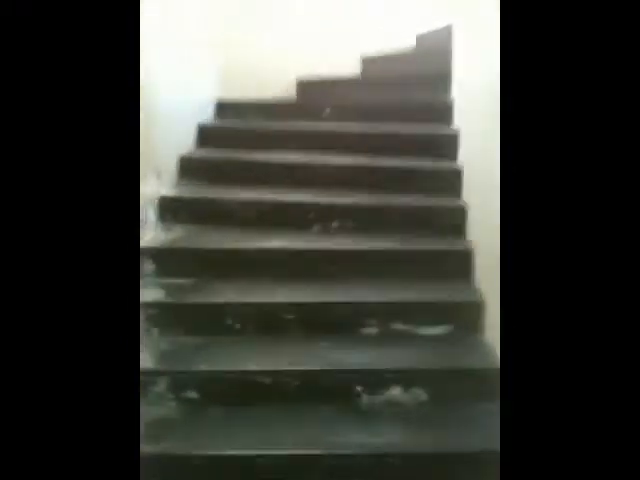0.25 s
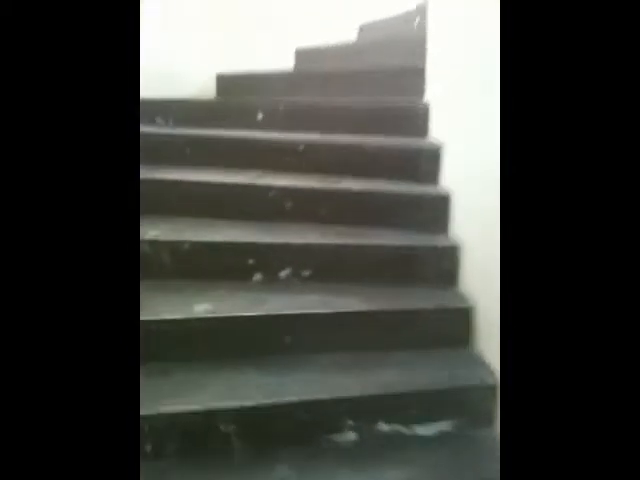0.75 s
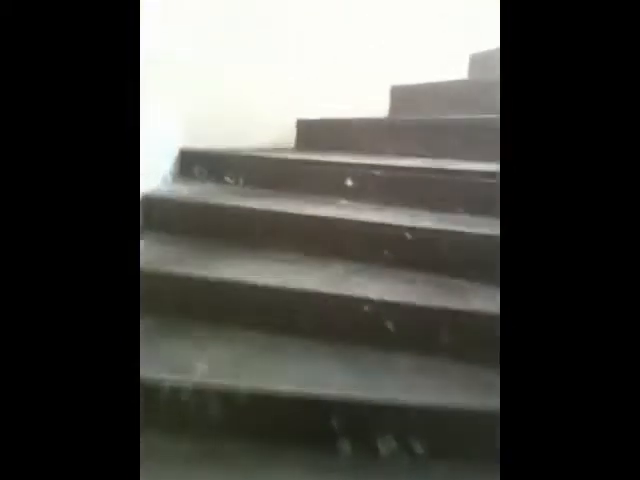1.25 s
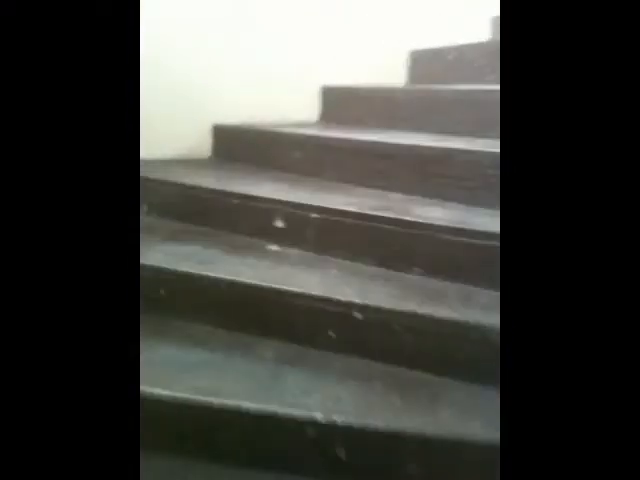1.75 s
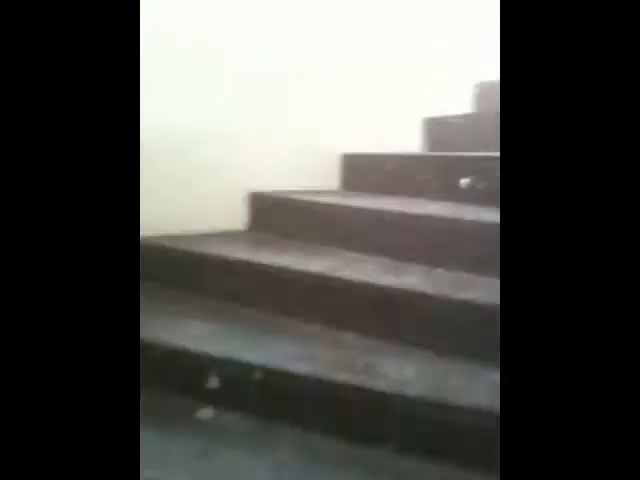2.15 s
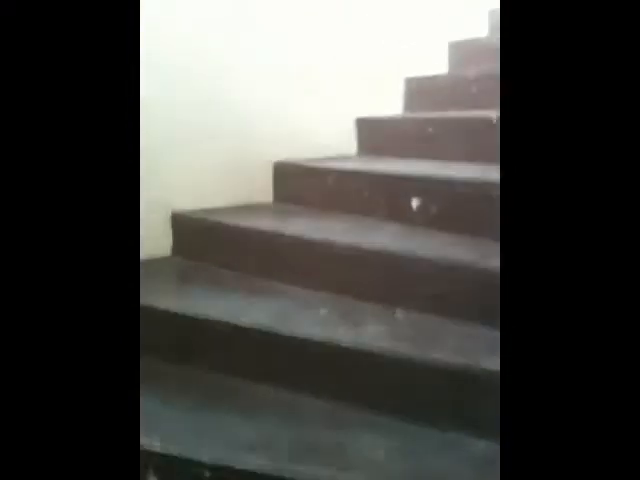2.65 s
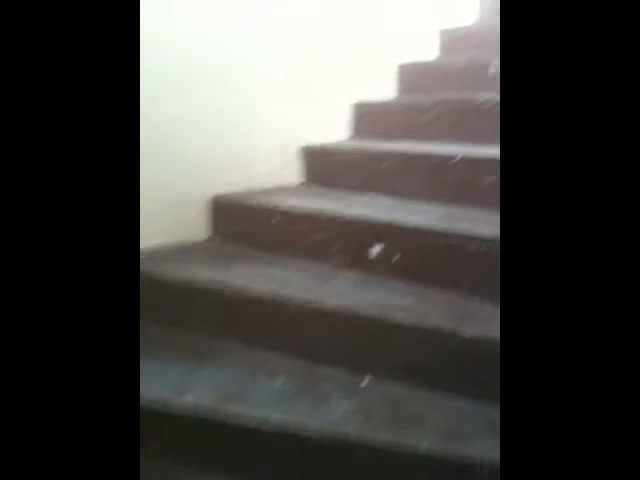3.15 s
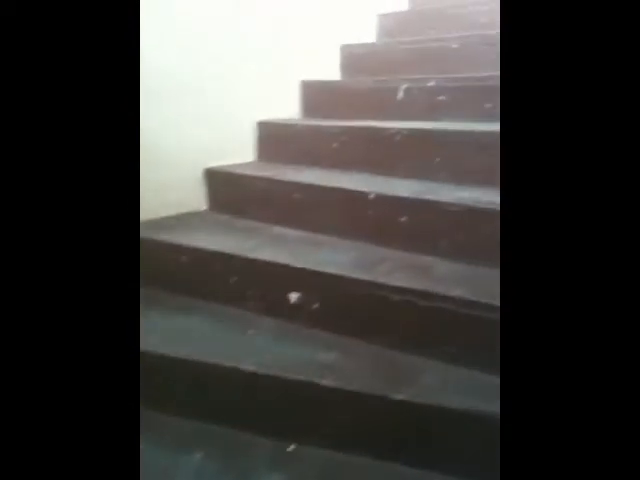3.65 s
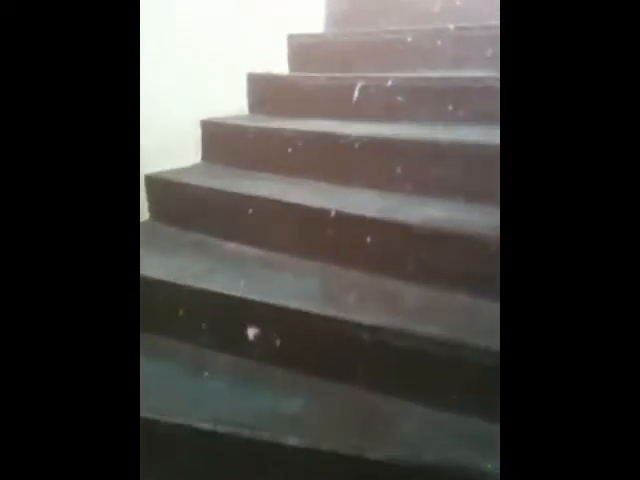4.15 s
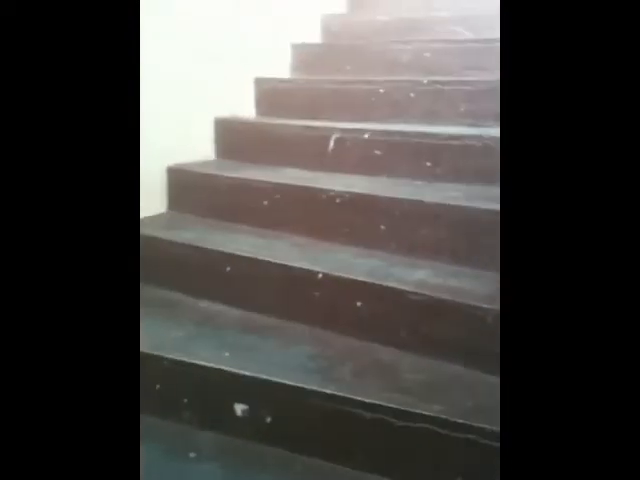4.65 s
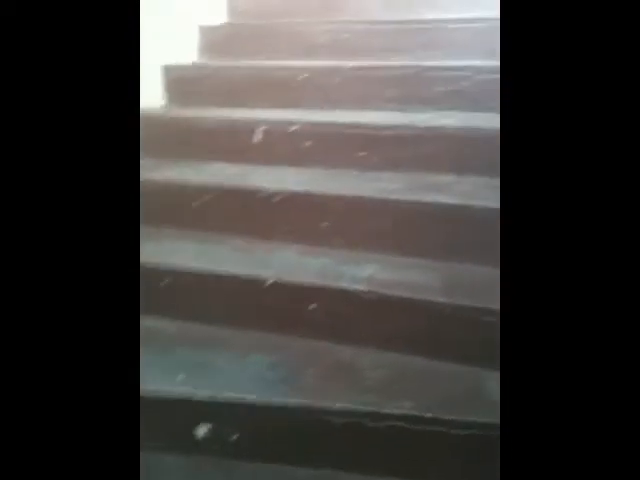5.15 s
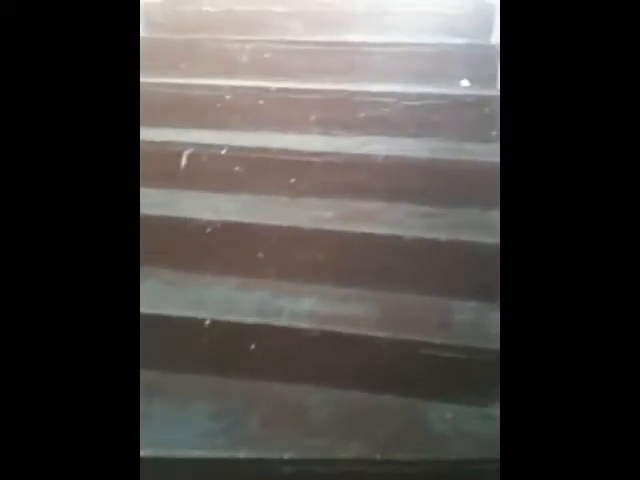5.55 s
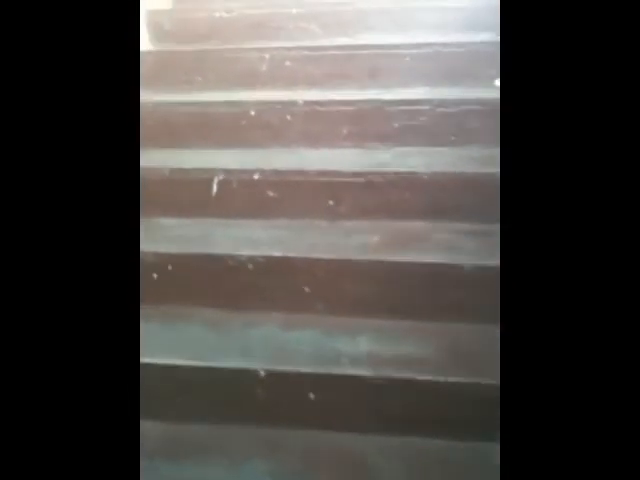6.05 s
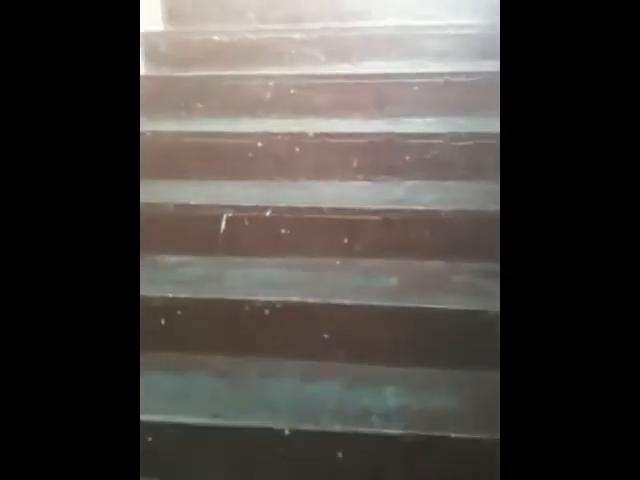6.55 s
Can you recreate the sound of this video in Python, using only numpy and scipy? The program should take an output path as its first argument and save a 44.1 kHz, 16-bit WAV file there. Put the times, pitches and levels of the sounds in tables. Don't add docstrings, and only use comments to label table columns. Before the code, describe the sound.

Heavy turbine and pump drone with wavering high whines and broadband water-and-air roar, heard while climbing concrete stairs, strongest in the last second.

```python
import sys
import numpy as np
from scipy import signal
from scipy.fft import rfft, irfft
from scipy.io import wavfile
from scipy.ndimage import uniform_filter1d

SR = 44100
rng = np.random.default_rng(int(sys.argv[2]) if len(sys.argv) > 2 else 0)


def rack_gain(trim_db):
    fader = np.asarray(trim_db, float)
    return 10 ** (fader / 20)


def persist_wave(psi):
    counts = np.round(np.clip(psi, -1, 1) * 32767).astype(np.int16)
    wavfile.write(sys.argv[1], SR, np.atleast_2d(counts).T)


N = 299880
PUMP_HZ, GEAR_SHAFT_HZ, RUNNER_HZ, MAINS_HZ = 191.47, 16.355, 10.525, 50.03
HZ = np.arange(N // 2 + 1) * SR / N
STEP_HZ = 200
STEPS = np.arange(int(N / SR * STEP_HZ)) / STEP_HZ

# (time [s], level [dB])
CLIMB_DB = [
    (0, -3),
    (1.5, -2.5),
    (3.2, -1),
    (4.3, .5),
    (4.9, 2.5),
    (5.5, 4.5),
    (6.1, 5.5),
    (6.8, 6),
]


def curve(table, t):
    s, *columns = np.transpose(table)
    return [np.interp(t, s, c) for c in columns]


def colour(points):
    hz, db = np.transpose(points)
    return rack_gain(np.interp(np.log(HZ + 1), np.log(hz), db))


def walk(rate_hz):
    hold = int(SR / rate_hz)
    held = np.repeat(rng.standard_normal(N // hold + 1), hold)
    return 1.2 * uniform_filter1d(uniform_filter1d(held, hold), hold)[:N]


def add(spectrum, hz, envelope):
    half = len(envelope) // 2
    at = int(round(hz * N / SR)) + np.arange(-half, half)
    slow = np.fft.fftshift(np.fft.fft(envelope))[:2 * half]
    spectrum[at[at > 0]] += slow[at > 0] * N / len(envelope) / np.sqrt(2)


def fading(hz, count=12):
    walk_m_s, sound_m_s = .48, 343
    rays = rng.random((count, 2))
    path_m = np.cos(np.pi * rays[:, :1]) * walk_m_s * STEPS
    turns = hz * path_m / sound_m_s + rays[:, 1:]
    return np.exp(2j * np.pi * turns).sum(axis=0) / np.sqrt(count)


def approach(hz, near_db):
    opens_hz = 1860
    return min(hz / opens_hz, 1) ** .5 * near_db


def roar(gain):
    hiss_per_near_db = 0.43
    near_db = curve(CLIMB_DB, np.arange(N) / SR)[0]
    noise = rfft(rng.standard_normal(N)) * gain * np.sqrt(SR / 2)
    out = np.zeros(N)
    for octave in np.arange(4.5, 14, .5):
        shape = np.cos(np.pi * np.clip(np.log2(HZ + 1) - octave, -.5, .5))
        rise_db = np.interp(octave, [7.1, 8.6, 10.4], [-.1, .6, .98]) * near_db
        rise_db += np.interp(octave, [12.3, 13.1], [0, hiss_per_near_db]) * near_db
        flutter_db = np.interp(octave, [9, 12], [1.1, .15]) * walk(6) + .9 * walk(18)
        out += irfft(noise * shape ** 2, N) * rack_gain(rise_db + flutter_db)
    return out


def water_and_air():
    # (frequency [Hz], level [dB per Hz])
    roar_db = [(40, -92), (75, -84), (150, -61.5), (300, -58), (550, -61), (900, -63.5), (1350, -73),
               (1750, -64), (3050, -68.5), (4200, -68), (4850, -70.5), (6400, -68), (9500, -77),
               (11800, -92.5), (13200, -98)]
    return roar(colour(roar_db))


def side_difference(mid):
    # (frequency [Hz], level [dB per Hz])
    side_noise_db = [(24, -64), (40, -40), (108, -5.5), (321, -4), (976, -7.5), (1240, -11.5), (2070, -6),
                     (3040, -11.5), (6440, -11.5), (11200, -27), (13000, -38)]
    return roar(colour(side_noise_db) * rack_gain(-54.5 - 15)) + rack_gain(-32.5) * walk(90) * mid


def shaft_tones():
    gear_orders = [40, 61, 80, 97, 99, 100, 101, 102, 104, 120, 122, 126, 157]
    gear_db = [-41, -42.5, -51.5, -50, -40.5, -38.5, -43, -39, -45.5, -47, -46, -47, -53]
    runner_orders = [20, 35, 38, 40, 42, 47, 48, 52, 65, 66.6, 75.5, 113, 226.2]
    runner_db = [-46.5, -49, -68, -45, -61, -55, -41, -50.5, -48.5, -47, -45, -48.5, -39]
    mains_orders = [2, 3, 4, 6]
    mains_db = [-57, -46.5, -46.5, -41.5]
    tones = [(k * GEAR_SHAFT_HZ, db) for k, db in zip(gear_orders, gear_db)]
    tones += [(k * RUNNER_HZ, db) for k, db in zip(runner_orders, runner_db)]
    tones += [(k * MAINS_HZ, db) for k, db in zip(mains_orders, mains_db)]
    return tones


def pump_tones():
    order_db = [0, 0, -13.5, -8, -13, -15, -9, -7, -11, -6, -4, -5, -4, -9, -10, -16, -14, -16, -11, -14,
                -11, -9, -15, -19, -20, -19, -13, -17, -18, -22, -17, -18, -13, -16, -17, -21, -22, -23,
                -28, -26]
    side_turns = [-2, -1, 1, 2, 6, 7]
    side_db = [-14, -11, -5, -18.5, -11.5, -13.5]
    pump_db, pistons, growth_db = -29, 12, 0.0333
    tones = []
    for order, db in enumerate(order_db, 1):
        if order not in (1, 2, 4, 7, 8, 10, 11, 12, 13):
            tones.append((order * PUMP_HZ, pump_db + db))
        if order > 5:
            for turns, under_db in zip(side_turns, side_db):
                grown_db = growth_db * max(order - 13, 0) * (1 + 2 * (turns == -1))
                cut_db = 2.1 * (turns > 2 and order < 10)
                hz = (order + turns / pistons) * PUMP_HZ
                tones.append((hz, pump_db + db + under_db + grown_db - cut_db))
    return tones


def machines(near_db):
    out = np.zeros(len(HZ), complex)
    for hz, db in shaft_tones() + pump_tones():
        add(out, hz, rack_gain(db + approach(hz, near_db)) * fading(hz))
    return out


def singers(near_db):
    singer_hz = [45 * RUNNER_HZ, 60 * GEAR_SHAFT_HZ]
    singer_hz += [k * PUMP_HZ for k in (4, 7, 8, 10, 11, 12, 13)]
    singer_db = [-41.5, -41, -43.5, -41, -39, -37, -33.5, -34.5, -38]
    # (time [s], level [dB], length [s])
    drone_spots = [
        [(.9, -37.5, 0.66), (4.0, -38, 1), (5.65, -31.5, 0.46)],
        [(2.33, -35.5, .3), (4.34, -34.5, 1), (5.15, -54, 0.35), (5.84, -30.5, .3), (6.7, -29, 0.21)],
        [(1.45, -36, 0.31), (2.0, -32.5, 0.3), (2.9, -26, 0.83), (3.96, -39, 2.5), (6.24, -31.5, 1)],
        [(.9, -38, 0.85), (2.4, -35.5, 0.46), (6.1, -32.5, 0.35)],
    ]
    # (time [s], level [dB], length [s])
    whine_spots = [
        [(.19, -31.5, 0.23), (1.06, -33, 0.29), (1.96, -33.5, 0.32), (5.75, -29.5, .19), (6.57, -27.5, 0.3)],
        [(.63, -33, 0.34), (2.11, -31, 0.32), (4.54, -31, 0.41), (5.72, -25.9, .19)],
        [(.66, -30.7, 0.22), (1.02, -28.5, 0.23), (1.78, -32.2, 0.47), (2.79, -26, 0.086), (3.92, -30.5, 0.77),
         (4.62, -25.5, 0.26), (5.3, -25, 0.44), (6.41, -28, 0.79)],
        [(4.46, -26.5, 0.26), (5.54, -29.5, 0.61), (6.61, -26.5, 0.7)],
        [(.12, -29.5, 0.12), (.85, -31, 0.53), (1.34, -27.5, 0.22), (2.65, -30.5, 0.19), (4.4, -31, 0.13),
         (5.2, -32, 0.51), (6.28, -27, 0.79)],
    ]
    out = np.zeros(len(HZ), complex)
    for hz, db, spots in zip(singer_hz, singer_db, drone_spots + whine_spots):
        envelope = rack_gain(db + approach(hz, near_db)) * fading(hz)
        for s, peak_db, length_s in spots:
            spot = np.exp(-2 * ((STEPS - s) / length_s) ** 2)
            phase = envelope[min(int(s * STEP_HZ), len(STEPS) - 1)]
            steady = rack_gain(peak_db) * phase / abs(phase)
            envelope = (1 - spot) * envelope + spot ** 2 * steady
        add(out, hz, envelope)
    return out


def standing_pump():
    nodes_s = [-.75, 1.29, 3.03, 4.84, 6.7, 8.4]
    lobe_db = [-25, -22.5, -23.5, -26, -33]
    flatness, node_leak = .85, .12
    half_waves = np.interp(STEPS, nodes_s, np.arange(len(nodes_s)))
    arch = abs(np.sin(np.pi * half_waves)) ** flatness
    loudness_db = np.interp(half_waves, np.arange(len(lobe_db)) + .5, lobe_db)
    return rack_gain(loudness_db) * np.hypot(arch, node_leak)


def hums():
    # (time [s], level [dB])
    octave_db = [
        (0.0, -33.5),
        (1.0, -32.5),
        (2.05, -53),
        (2.52, -37.5),
        (2.99, -43),
        (3.22, -33),
        (5.19, -37.5),
        (6.21, -28),
        (6.8, -29),
    ]
    # (time [s], level [dB])
    mesh_db = [(0.0, -36.5), (0.66, -30.5), (1.53, -41), (1.74, -29.5), (1.93, -38.5), (2.56, -29.5),
               (2.97, -34.5), (3.14, -25.5), (3.41, -24), (3.79, -36), (3.82, -53), (3.9, -34),
               (4.05, -28.5), (4.87, -20.5), (4.96, -24.5), (6.1, -11.5), (6.5, -13.5), (6.8, -22.5)]
    out = np.zeros(len(HZ), complex)
    tones = [(PUMP_HZ, standing_pump()),
             (2 * PUMP_HZ, rack_gain(curve(octave_db, STEPS)[0])),
             (20 * GEAR_SHAFT_HZ, rack_gain(curve(mesh_db, STEPS)[0]))]
    for hz, rms in tones:
        drift = .5 * fading(hz) + 0.5
        add(out, hz, rms * drift / abs(drift))
    return out


def scene():
    # (frequency [Hz], level [dB])
    right_db = [(300, 0.2), (600, 1.1), (9000, 0.4), (12000, 24)]
    near_db = curve(CLIMB_DB, STEPS)[0]
    tones = machines(near_db - 2.0) + singers(near_db) + hums()
    mid = irfft(tones, N) + water_and_air()
    side = side_difference(mid)
    tilt = colour(right_db)
    left, right = (irfft(rfft(mid) * tilt ** s, N) for s in (-.5, .5))
    return np.array([left + side, right - side])


def band_limit(x):
    return signal.sosfilt(signal.butter(12, 13690, fs=SR, output="sos"), x)


def record(dry):
    rounded = np.tanh(.4 * dry) / .4
    return band_limit(rounded)


dry = scene()
out = record(dry)
persist_wave(out)
```